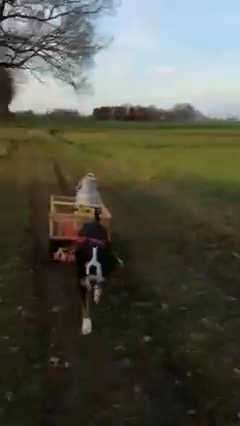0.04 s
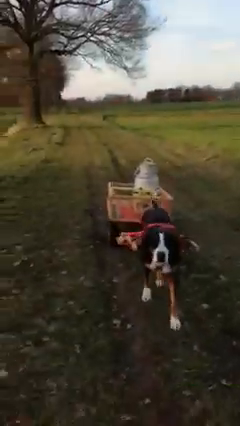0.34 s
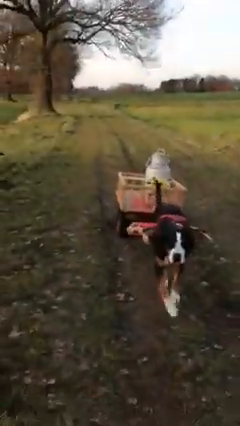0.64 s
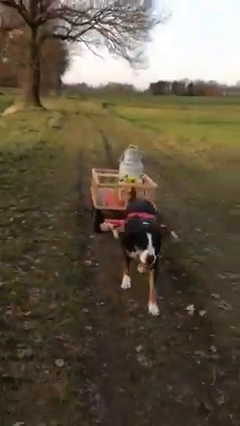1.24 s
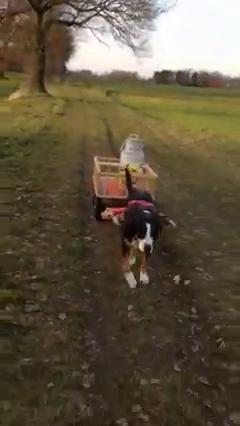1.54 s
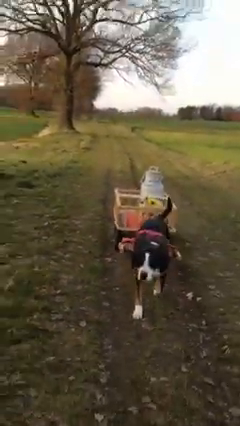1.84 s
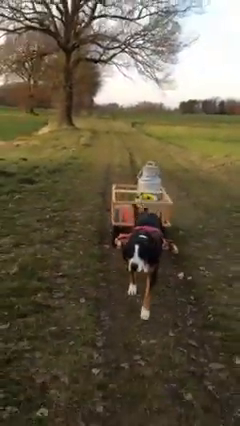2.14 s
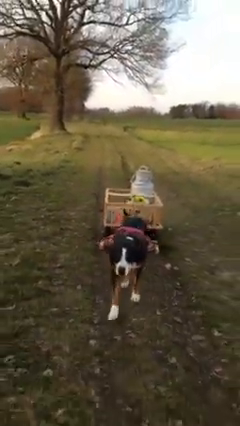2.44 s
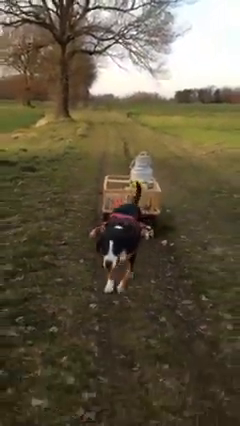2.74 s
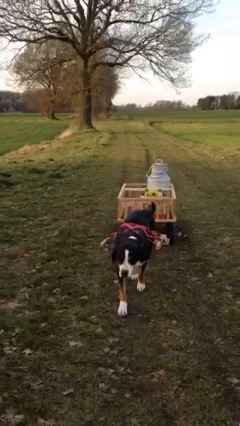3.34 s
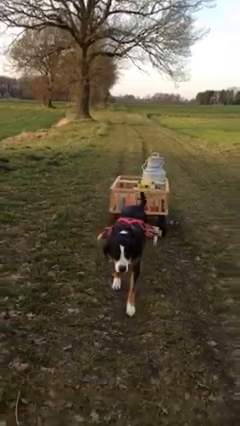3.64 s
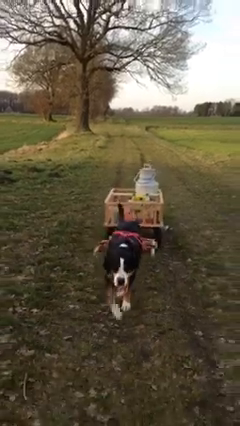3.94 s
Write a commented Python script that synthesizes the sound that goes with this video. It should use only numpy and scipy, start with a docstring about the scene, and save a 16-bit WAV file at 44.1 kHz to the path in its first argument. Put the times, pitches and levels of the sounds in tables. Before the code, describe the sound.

Footsteps and dog paws crunch dry leaves and scuff turf throughout, with small hollow clops, busier after 1.2 seconds. A wooden cart's wheels rustle and rumble softly, with a few light knocks and faint thin squeaks from about 1 to 2.8 seconds. Wind thumps the microphone over a low breeze, strongest at the start, from 1.3 to 1.9 seconds and again near 3.4 seconds.

```python
"""On a grassy track strewn with dry leaves, a walker leads a dog that pulls a small wooden cart.
Shoes and paws crunch the leaves, scuff the turf, land with hollow clops and flick single leaves aside.
The wheels rustle and rumble, rattling contacts ring the cart's frame, and something squeaks thinly.
Wind thumps on the microphone in short gusts over a low breeze."""
import sys
import numpy as np
from scipy import signal
from scipy.fft import rfft, irfft, next_fast_len
from scipy.io import wavfile
from scipy.ndimage import uniform_filter1d, map_coordinates

SR = 44100
rng = np.random.default_rng(int(sys.argv[2]) if len(sys.argv) > 2 else 0)


def wav_out(sig):
    """Save sig, one row per channel (or a flat mono array), as 16-bit PCM at SR to the path in sys.argv[1]."""
    wavfile.write(sys.argv[1], SR, np.round(np.clip(np.atleast_2d(sig).T, -1, 1) * 32767).astype(np.int16))


N = 176400


def footsteps(clump_db=2.0):
    """Every footfall crushes leaves and scuffs the turf under them."""
    # shoes and paws landing (peak time [s], rise [s], fade [s], leaf crunch [dB], turf scuff [dB])
    steps = [(0.013, 0.012, 0.038, -43, -64), (0.082, 0.004, 0.016, -43, -33),
             (0.108, 0.0016, 0.017, -36, -34.5), (0.253, 0.0081, 0.033, -49, -44),
             (.5, 0.048, 0.035, -51, -67), (.91, 0.01, 0.0057, -50, -73), (.985, 0.014, 0.044, -52, -62),
             (1.234, 0.0071, 0.017, -42, -38.5), (1.281, 0.013, 0.041, -38.5, -45.5),
             (1.447, 0.015, 0.024, -36.5, -37), (1.496, 0.0045, 0.036, -38.5, -46),
             (1.627, 0.0087, 0.017, -34.5, -30.5), (1.708, 0.0065, 0.0034, -43.5, -47.5),
             (1.858, 0.0082, 0.0087, -35.5, -33), (1.88, 0.027, 0.029, -45, -67),
             (1.958, 0.0038, 0.017, -52, -38), (1.975, 0.015, 0.038, -46.5, -51),
             (2.084, 0.004, 0.034, -45.5, -47.5), (2.139, .006, 0.014, -37.5, -44),
             (2.186, 0.0084, 0.015, -37, -53), (2.244, 0.0087, 0.02, -24.5, -29.5),
             (2.442, 0.0089, 0.025, -52, -44.5), (2.526, 0.024, 0.022, -43, -44),
             (2.555, 0.03, 0.014, -32.5, -36), (2.651, 0.015, 0.018, -43.5, -44.5),
             (2.733, 0.033, 0.01, -42.5, -52), (2.896, 0.007, 0.028, -45, -45.5),
             (2.982, 0.0078, 0.015, -44.5, -44.5), (3.091, 0.025, 0.012, -44.5, -49.5),
             (3.131, 0.0027, 0.02, -35, -38.5), (3.173, 0.005, 0.02, -30.5, -36.5),
             (3.197, 0.015, .02, -35.5, -52), (3.247, .012, 0.012, -44, -36),
             (3.281, 0.015, 0.019, -35, -37.5), (3.357, 0.013, 0.035, -49, -39),
             (3.496, 0.0089, 0.021, -37.5, -42.5), (3.647, 0.0086, 0.025, -29, -28.5),
             (3.734, 0.014, 0.022, -40.5, -38.5), (3.757, 0.013, 0.018, -36, -49),
             (3.918, 0.0015, 0.019, -41.5, -42), (3.947, 0.026, 0.015, -36.5, -38.5)]
    # tone of crushed leaves (frequency [Hz], level [dB])
    leaf_colour = [(200, 0), (600, 5), (1400, -15), (2400, -7.5), (3200, -11), (4400, -1), (5700, 0.5),
                   (6400, 2), (8200, 4), (11500, 0.5), (12700, 5.5), (14000, 0), (15200, 0.5)]
    # tone of scuffed turf (frequency [Hz], level [dB])
    turf_colour = [(80, -5), (250, -6), (580, 9), (850, -0.5), (1080, 5), (1260, -3.5), (1500, 5),
                   (1850, -2.5), (2300, -1), (3100, -10.5), (3900, -10), (5000, -15), (12000, -39)]
    crunch_power, scuff_power = np.zeros(N), np.zeros(N)
    for at, rise, fade, crunch_db, scuff_db in steps:
        force = press(at, rise, fade)
        crunch_power += (amp(crunch_db) * force) ** 2
        scuff_power += (amp(scuff_db) * force) ** 2
    crunch = np.sqrt(crunch_power) * crackle(leaf_colour)
    scuff = np.sqrt(scuff_power) * crackle(turf_colour)
    return (crunch + scuff) * amp(clump_db * wobble(220))


def clops(roughness_hz=228, rise_s=0.0045, fade_s=0.0049):
    """A foot that lands squarely, or a faint knock, gives a short, rough, hollow ring in one broad resonance."""
    # square landings, plus a faint knock at 0.674 s (peak time [s], level [dB], pitch [Hz])
    landings = [(.083, -51, 1553), (0.253, -44, 1600), (0.674, -43, 694), (1.235, -38.5, 1550),
                (1.45, -33.5, 1600), (1.631, -45, 1490), (1.855, -28.5, 1570), (1.956, -46, 1560),
                (2.08, -49.5, 1650), (2.437, -44, 1900), (2.524, -54, 1850), (2.899, -41, 1480),
                (2.982, -45.5, 1530), (3.132, -33, 1500), (3.175, -32, 582), (3.249, -43, 1454),
                (3.274, -35, 1375), (3.649, -32.5, 1407), (3.736, -34, 1510), (3.918, -34.5, 1320)]
    out = np.zeros(N)
    roughness = wobble(roughness_hz) + 1j * wobble(roughness_hz)  # smears a tone into a band
    for at, db, hz in landings:
        force = press(at, rise_s, fade_s)
        ring = force * np.real(roughness * np.exp(2j * np.pi * hz * clock()))
        out += amp(db) * ring * np.linalg.norm(force) / np.linalg.norm(ring)
    return out


def leaf_flicks(rise_s=0.00059, fade_s=0.011):
    """Feet flick single dry leaves, each a short bright swish."""
    # flicked leaves (peak time [s], level [dB])
    flicks = [(0.203, -38.5), (.302, -42.5), (.807, -50.5), (1.082, -26.5), (1.186, -36), (1.245, -35.5),
              (1.353, -39.5), (1.381, -45), (1.766, -46), (2.334, -33), (2.484, -44), (2.709, -29),
              (2.822, -30.5), (3.037, -36.5), (3.51, -36), (3.799, -36.5)]
    # tone of a flicked leaf (frequency [Hz], level [dB])
    flick_colour = [(500, -13), (1500, -7.5), (3200, -21.5), (4000, -14.5), (5600, -10), (6400, -4),
                    (7200, -3), (8000, 0), (9800, -4.5), (11500, -5.5), (12600, 6), (13600, -7),
                    (15200, -3)]
    envelope = sum(amp(db) * press(at, rise_s, fade_s) for at, db in flicks)
    return envelope * crackle(flick_colour)


def wheels(rustle_bumps_db=3.0, rumble_bumps_db=2.5):
    """The wheels roll unevenly, rustling through leaves and rumbling over turf."""
    # level curves of the roll (time [s], leaf rustle [dB], turf rumble [dB])
    roll = [(0, -45.5, -43.5), (.18, -57, -51.5), (.42, -58, -52), (.62, -62, -53.5), (.76, -70, -54.5),
            (0.901, -55.5, -51.5), (1.03, -52.5, -49.5), (1.16, -55, -55), (1.4, -57, -50),
            (1.57, -52, -51), (1.75, -55, -49.5), (1.93, -51.5, -50), (2.06, -55.5, -53),
            (2.3, -45.5, -48.5), (2.42, -50.5, -50), (2.8, -47.5, -51), (3.2, -45.5, -46.5),
            (3.56, -50, -51.5), (4, -51.5, -50)]
    # tone of leaves under the wheels (frequency [Hz], level [dB])
    rustle_colour = [(500, -3), (2000, -13), (3200, -16), (4500, -3.5), (5600, -1), (7000, 4), (10000, 3.5),
                     (12700, 4), (15200, 3.5)]
    # tone of turf under the wheels (frequency [Hz], level [dB])
    rumble_colour = [(60, -8), (200, 1), (550, 3), (900, -6.5), (1500, -7.5), (2500, -11), (4000, -18),
                     (10000, -25.5)]
    times, rustle_db, rumble_db = np.transpose(roll)
    rustle = amp(np.interp(clock(), times, rustle_db) + rustle_bumps_db * wobble(55))
    rustle *= crackle(rustle_colour)
    rumble = amp(np.interp(clock(), times, rumble_db) + rumble_bumps_db * wobble(40))
    rumble *= crackle(rumble_colour)
    return rustle + rumble


def cart_knocks(rattle_s=0.0032, reach_octaves=1.42):
    """A brief rattling contact rings the cart's wooden frame, favouring the modes near its focus."""
    # contacts on the frame (time [s], strength [dB], focus [Hz])
    knocks = [(0.08, -39.5, 1240), (.106, -29.5, 5600), (.943, -35, 1370), (1.8, -47, 3900),
              (2.61, -44.5, 3300), (3.947, -36, 4600)]
    # modes of the frame (frequency [Hz], relative level [dB], time to fall 60 dB [s])
    wood_modes = [(596, 7.5, 0.098), (1054, -10, 0.055), (1333, -5.5, 0.076), (1882, -4.5, 0.095),
                  (2070, 0.5, 0.035), (2582, 2.5, 0.083), (3040, -0.5, 0.022), (3360, -9.5, 0.018)]
    out, t = np.zeros(N + SR), np.arange(SR // 4) / SR
    for at, db, focus_hz in knocks:
        contact = rng.standard_normal(len(t)) * t / rattle_s * np.exp(-t / rattle_s)
        for hz, mode_db, t60 in wood_modes:
            mode = np.sin(2 * np.pi * hz * t) * amp(-60 * t / t60)
            ring = signal.fftconvolve(contact, mode)[:len(t)]
            gain = amp(db + mode_db) / (1 + (np.log2(hz / focus_hz) / reach_octaves) ** 2)
            out[round(at * SR):][:len(t)] += gain * ring / np.abs(ring).max()
    return out[:N]


def squeaks(slide_share=0.025, waver_share=0.012, rasp_db=3.0):
    """Faint raspy whistles, perhaps of a wheel, slide up in pitch and sag a little."""
    # thin squeaks (midpoint [s], length [s], pitch [Hz], level [dB])
    whistles = [(1.11, 0.052, 4550, -51), (1.301, 0.042, 4530, -52), (1.586, 0.082, 4540, -47.5),
                (1.775, 0.093, 4560, -47.5), (1.888, .07, 7400, -49), (2.053, 0.075, 4530, -49.5),
                (2.268, 0.063, 4460, -46), (2.578, 0.075, 4530, -46), (2.78, 0.11, 4530, -55)]
    out, waver = np.zeros(N), waver_share * wobble(1100)
    for at, length, hz, db in whistles:
        progress = np.clip(2 * (clock() - at) / length, -1, 1)
        arch = 1 / 4 - np.minimum(progress, progress / 2) ** 2
        pitch = hz * (1 + slide_share * arch + waver)
        out += amp(db) * (1 - progress ** 2) * np.sin(2 * np.pi * np.cumsum(pitch) / SR)
    return out * unit(amp(rasp_db * wobble(320)))


def wind_gusts(skirt_share=0.77):
    """Turbulence thumps on the microphone; each gust is duller as it builds and dies."""
    # gusts (peak time [s], time scale [s], level [dB], upper edge at the peak [Hz])
    gusts = [(0.05, 0.0067, -15, 400), (0.149, 0.013, -18.5, 386), (0.265, 0.0046, -26, 427),
             (0.458, 0.0098, -27.5, 208), (.657, 0.0035, -15.5, 283), (0.727, 0.0039, -29.5, 138),
             (.762, 0.0028, -28.5, 260), (0.796, 0.0032, -24.5, 287), (0.828, 0.0033, -29, 344),
             (0.881, 0.0091, -24.5, 284), (0.987, 0.0057, -25.5, 242), (1.021, 0.0057, -27, 536),
             (1.124, 0.0063, -28.5, 390), (1.153, 0.0026, -21, 197), (1.177, 0.003, -22, 140),
             (1.192, 0.0018, -29.5, 236), (1.283, 0.0081, -29, 245), (1.319, 0.0087, -14.5, 480),
             (1.477, 0.0062, -24, 216), (1.55, 0.018, -19, 430), (1.566, 0.0027, -21, 780),
             (1.601, 0.0059, -21.5, 152), (1.656, 0.0051, -16.5, 300), (1.711, 0.0047, -18, 298),
             (1.768, 0.0046, -27.5, 326), (1.81, 0.0074, -19.5, 220), (1.831, 0.0048, -19, 130),
             (1.861, 0.0042, -22.5, 136), (1.918, 0.0035, -24, 253), (2.64, 0.0087, -25.5, 160),
             (2.693, 0.004, -25, 160), (2.843, 0.0043, -17.5, 298), (2.931, 0.0074, -26.5, 135),
             (3.373, 0.0025, -21, 650), (3.384, 0.0048, -23, 610), (3.399, 0.0048, -15, 585),
             (3.428, 0.015, -18.5, 760), (3.52, 0.0028, -27.5, 393), (3.775, 0.01, -30.5, 257),
             (3.905, 0.005, -35.5, 237)]
    out = np.zeros(N)
    for at, span, db, edge_hz in gusts:
        near = slice(max(0, round(at * SR) - SR // 8), round(at * SR) + SR // 8)
        swell = press(at, rise=1.24 * span, fade=1.55 * span)[near]
        air = swell * rng.standard_normal(SR // 2)[:len(swell)]
        core = gust_band(air * swell, edge_hz)
        skirt = gust_band(air * (1 - swell), skirt_share * edge_hz)
        gust = core + skirt
        effective_samples = np.sqrt(np.pi) * span * SR
        out[near] += amp(db) * gust * np.sqrt(effective_samples) / np.linalg.norm(gust)
    return out


def gust_band(air, edge_hz, edge_order=3.3, low_hz=56.6, knee_hz=130):
    """Shape noise into a bass thump: a high cut, a low cut and a gentle downward tilt."""
    def response(hz):
        high_cut = 1 + (hz / edge_hz) ** (2 * edge_order)
        low_cut = 1 + (low_hz / (hz + 1)) ** 8
        tilt = 1 + hz / knee_hz
        return 1 / np.sqrt(high_cut * low_cut * tilt)
    return filtered(air, response)


def eddy_pops():
    """Single hard eddies hit the microphone port, each one pressure pulse."""
    # eddies (time [s], peak level [dB], centre [Hz])
    pops = [(0.1876, -11.5, 402), (1.3147, -7, 623), (1.654, -4, 463), (3.398, -22, 1240),
            (3.523, -23, 485)]
    out = np.zeros(N)
    for at, db, hz in pops:
        phase = np.pi * hz * (clock() - at)
        out -= amp(db) * (1 - 2 * phase ** 2) * np.exp(-np.minimum(phase ** 2, 50))
    return out


def breeze(lumps_db=3, lift_db=3):
    """Moving air lays a low, lumpy rumble on the microphone."""
    # level curve of the breeze (time [s], level before lift and lumps [dB])
    swells = [(0, -34.5), (.2, -39.5), (.35, -43.5), (.58, -44.5), (.75, -41), (1.05, -44.5), (1.25, -37),
              (1.4, -42), (1.7, -35), (1.95, -36.5), (2.15, -53.5), (2.55, -49), (2.75, -44.5), (3.02, -43),
              (3.17, -64), (3.45, -42), (3.58, -54), (3.72, -50.5), (3.79, -37.5), (4, -41.5)]
    # tone of the breeze (frequency [Hz], level [dB])
    breeze_colour = [(20, -38), (35, -19), (55, -0.5), (110, -2.5), (200, -13), (350, -31), (700, -55),
                     (2000, -66)]
    level_db = np.interp(clock(), *np.transpose(swells)) + lift_db + lumps_db * wobble(23)
    return amp(level_db) * coloured(rng.standard_normal(N), breeze_colour)


def crackle(colour, grains_per_s=4000, spread_db=3.5, smooth_share=0.61):
    """Dense tiny fractures of random size over smooth rubbing noise, at rms 1."""
    sizes = amp(spread_db * np.minimum(rng.exponential(size=N), 4)) * rng.choice([-1, 1], N)
    grains = unit(sizes * (rng.random(N) < grains_per_s / SR))
    rubbing = rng.standard_normal(N)
    texture = np.sqrt(1 - smooth_share) * grains + np.sqrt(smooth_share) * rubbing
    return coloured(patchy(texture), colour)


def patchy(x, depth_db=3):
    """Each leaf has its own colour: the tone shifts at random from moment to moment."""
    spectra = signal.stft(x, nperseg=512)[2]
    patches = uniform_filter1d(rng.standard_normal(spectra.shape), size=6, axis=0)  # across frequency
    patches = uniform_filter1d(patches, size=4, axis=1)  # across time
    return signal.istft(spectra * amp(depth_db * unit(patches)), nperseg=512)[1][:N]


def press(at, rise, fade, steepness=1.5):
    """Envelope of a contact: a quick swell to its peak, then an exponential fade."""
    t = clock() - at
    depth = np.where(t < 0, np.abs(t / rise) ** steepness, t / fade)
    return np.exp(-np.minimum(depth, 20))


def coloured(x, points):
    """x through an EQ curve of (frequency [Hz], level [dB]) points, at rms 1."""
    points_hz, db = np.transpose(points)
    return unit(filtered(x, lambda hz: amp(np.interp(np.log(hz + 1), np.log(points_hz), db))))


def filtered(x, response):
    """x through a filter given as gain against frequency."""
    size = next_fast_len(len(x) + 8192)
    return irfft(rfft(x, size) * response(np.fft.rfftfreq(size, 1 / SR)), size)[:len(x)]


def wobble(rate):
    """A smooth random curve, rate knots a second."""
    return map_coordinates(rng.standard_normal(4096), [clock() * rate], mode="wrap")


def amp(db):
    """Decibels to gain."""
    return 10 ** (np.asarray(db) / 20)


def unit(x):
    """Scale to rms 1."""
    return x / np.sqrt(np.mean(x ** 2) + 1e-20)


def clock():
    """Time of every sample, in seconds."""
    return np.arange(N) / SR


def scene():
    """Feet, cart and wind in the open field, in mono."""
    feet = footsteps() + clops() + leaf_flicks()
    cart = wheels() + cart_knocks() + squeaks()
    wind = breeze() + wind_gusts() + eddy_pops()
    return (feet + cart + wind)[None]


def record(dry, top_hz=15350):
    """The microphone housing colours the treble; nothing passes above the band limit."""
    # narrow resonances of the housing (centre [Hz], half width [Hz], boost [dB])
    housing = [(3880, 106, 7), (5220, 35, 9.5), (6280, 180, 5), (6700, 17, 3.5), (8100, 21, 10),
               (8400, 22, 2), (10020, 60, 4.5)]

    def response(hz):
        boost_db = sum(db / (1 + ((hz - centre) / width) ** 2) for centre, width, db in housing)
        return amp(boost_db) * (hz < top_hz)
    return filtered(dry[0], response)[None]


dry = scene()
out = record(dry)
wav_out(out)
```